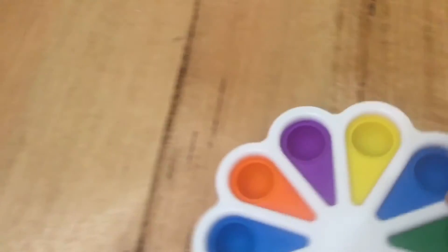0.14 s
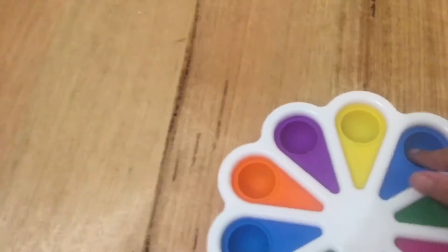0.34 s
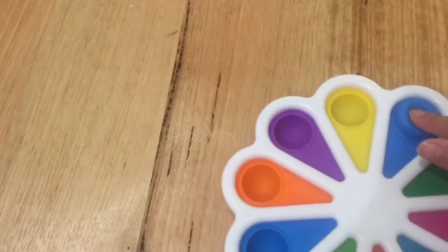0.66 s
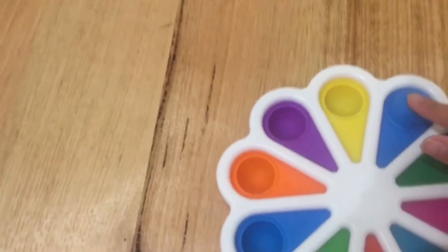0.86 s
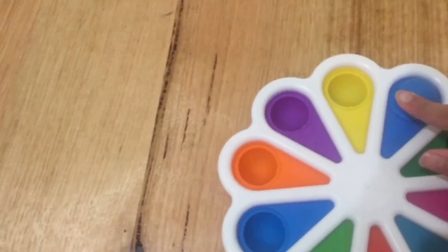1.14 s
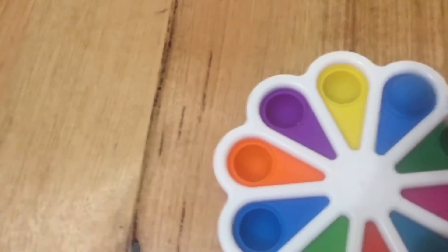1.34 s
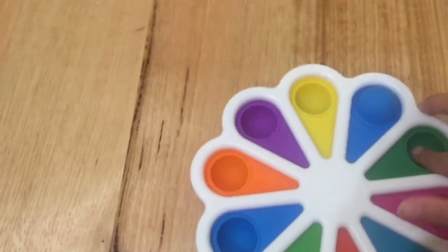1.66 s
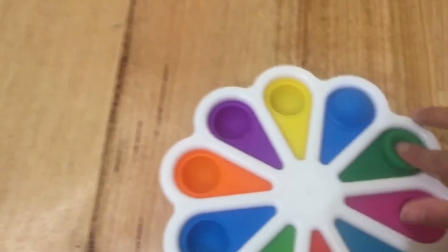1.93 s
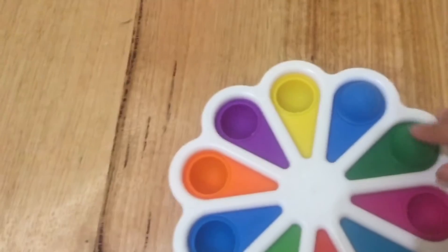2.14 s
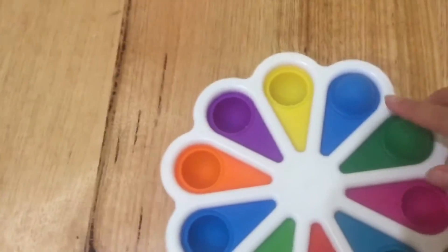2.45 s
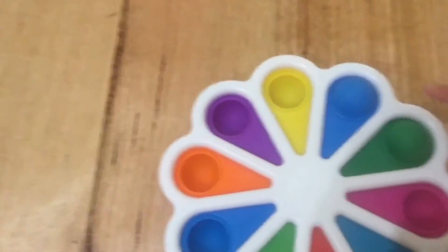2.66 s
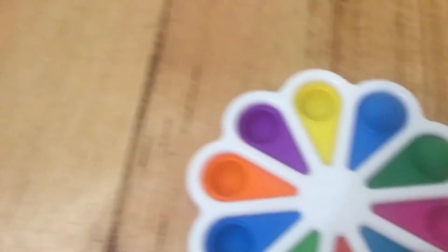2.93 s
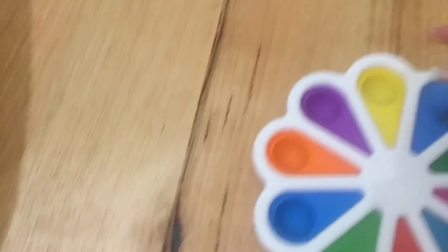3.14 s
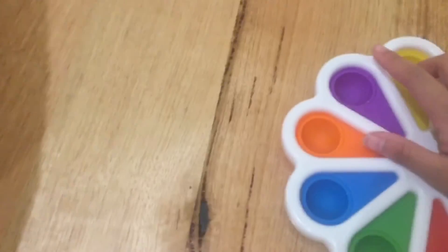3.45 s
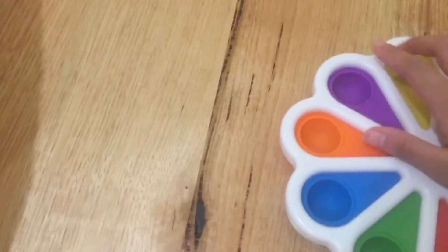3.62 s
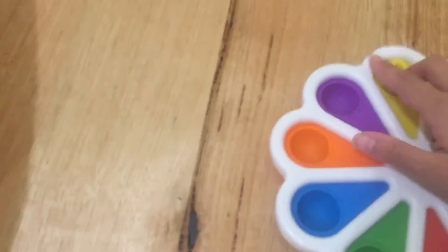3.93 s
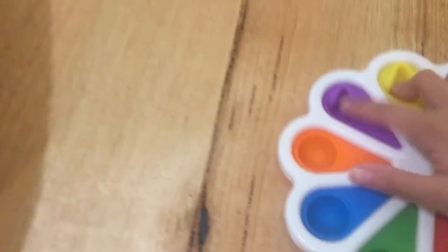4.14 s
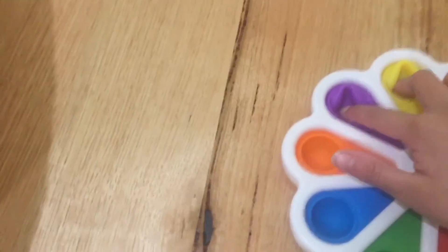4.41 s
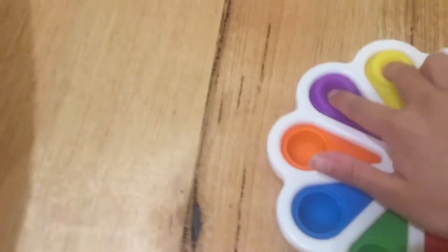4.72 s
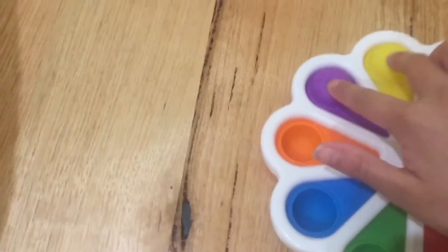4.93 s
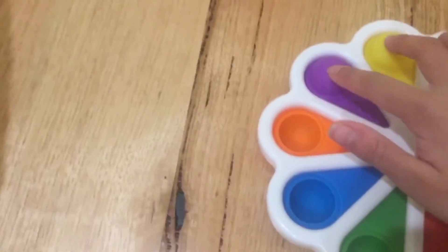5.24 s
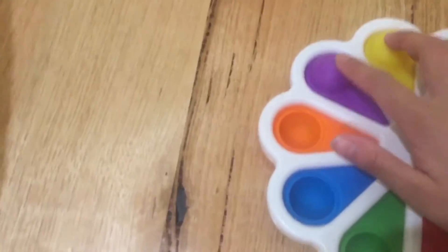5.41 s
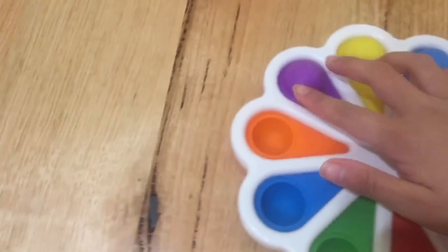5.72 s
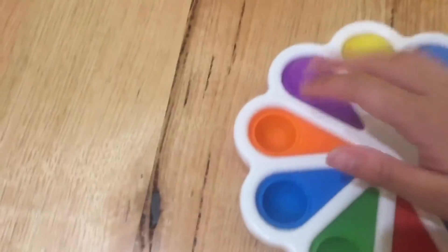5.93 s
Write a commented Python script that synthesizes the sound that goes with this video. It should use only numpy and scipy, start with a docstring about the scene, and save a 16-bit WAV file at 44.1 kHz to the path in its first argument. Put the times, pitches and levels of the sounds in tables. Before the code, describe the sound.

Time-reversed popping of a push-bubble toy, close to one microphone in a small room. Soft skin scuffs lead to one dominant hard pop with a low boom; faint squeaks and ticks follow, then a flurry of clacks. After a lull come crisp snaps, paired hollow pops and finally soft, muffled knocks. Every sound rises and ends suddenly over low rumble and hiss.

```python
"""In a small, quiet room the silicone bubbles of a push-pop toy are pressed on a wooden table.
Each pop is a struck set of decaying modes with a diffuse room tail, reversed in time: it swells and stops dead.
Booms are low modes amid narrow-band noise, also reversed; fingers rub and squeak as resonated random slips.
Beneath it all lies the steady, coloured noise of the room."""
import sys
import numpy as np
from scipy import signal
from scipy.fft import rfft, irfft, next_fast_len
from scipy.io import wavfile
from scipy.ndimage import uniform_filter1d

SR = 44100
rng = np.random.default_rng(int(sys.argv[2]) if len(sys.argv) > 2 else 0)


def inscribe(sig):
    """Save sig as 16-bit PCM at rate SR to the path in sys.argv[1].

    A 1-D sig is mono; a 2-D sig holds one channel per row.
    Samples are clipped to [-1, 1] before scaling.
    """
    pcm = np.round(np.clip(np.atleast_2d(sig).T, -1, 1) * 32767)
    wavfile.write(sys.argv[1], SR, pcm.astype(np.int16))


N = 267863  # length of the scene in samples


def undb(db):
    """Level definition: an amplitude gain is ten to the power of a twentieth of its decibels."""
    return 10 ** (np.asarray(db) / 20)


def unit(x):
    """Power normalization: scale a signal to a root mean square of one."""
    return x / np.sqrt(np.mean(x ** 2))


def decay(t, t60):
    """Exponential decay: the amplitude falls by 60 dB in every t60 seconds."""
    return np.exp(-np.log(1000) * t / t60)


def colour(x, points):
    """Linear filtering: weight the spectrum by (Hz, dB) points joined along a logarithmic frequency axis."""
    hz, db = np.transpose(points)
    f = np.maximum(np.fft.rfftfreq(len(x), 1 / SR), 1)
    gain = undb(np.interp(np.log(f), np.log(hz), db))
    return irfft(rfft(x) * gain, len(x))


def resonate(x, hz, width_hz):
    """Resonance: a second-order system passes its centre frequency with a gain of one."""
    b, a = signal.iirpeak(hz, hz / width_hz, fs=SR)
    return signal.lfilter(b, a, x)


def resonate_twice(x, hz, width_hz):
    """Cascaded resonance: two equal resonators in series give steeper skirts."""
    return resonate(resonate(x, hz, width_hz), hz, width_hz)


def add_reversed(out, sound, end_s):
    """Time reversal: superpose a sound backwards, so that its attack comes last, at end_s."""
    end = min(int(end_s * SR), N)
    count = min(end, len(sound))
    out[end - count:end] += sound[:count][::-1]


def air(level_db=-67):
    """Stationary noise: the faint, steady rumble and hiss of the room is random noise of a fixed spectrum."""
    # Spectrum of the background. Each row: frequency in Hz, relative level in dB per Hz.
    spectrum = [(15, -32), (25, -2.5), (43, -2), (80, 0), (113, -8), (148, -7), (241, -12.5), (269, -13.5),
                (392, -13.5), (449, -17), (527, -12.5), (587, -16), (857, -16.5), (1510, -19),
                (15800, -24.5)]
    return undb(level_db) * unit(colour(rng.standard_normal(N), spectrum))


def rubs(grain_db=5, patchy_db=2.0, patch_s=0.0084):
    """Friction: tiny random slips of skin on silicone excite resonators, broad for scuffs, narrow for squeaks."""
    # Scuffs of the fingers. Each row: middle in seconds, half length in seconds, level in dB, pitch in Hz.
    scuffs = [(0.026, 0.022, -67.5, 1800), (0.106, 0.09, -72, 885), (0.329, .14, -70, 1900),
              (0.404, 0.032, -62, 2400), (.865, .17, -70.5, 750), (2.656, .2, -78.5, 2800),
              (3.36, .11, -68.5, 900)]
    # Faint squeaks and one high, hissing scuff. Each row: middle in seconds, half length in seconds,
    # pitch in Hz, width of each resonator in Hz, level in dB.
    further_strokes = [(.395, 0.024, 7400, 1800, -61), (1.04, 0.1, 3660, 240, -69.5),
                       (1.043, 0.093, 2900, 240, -73), (1.173, .045, 2580, 500, -74),
                       (4.03, .033, 3720, 400, -75)]
    scuff_width = 1.7  # as a share of the scuff's pitch
    skin_hz, skin_width_hz, skin_db = 11605, 9000, -1  # dry hiss of the skin; dB over its scuff

    out, t = np.zeros(N), np.arange(N) / SR
    slips = rng.standard_normal(N) * undb(grain_db * rng.standard_normal(N))
    patches = unit(uniform_filter1d(rng.standard_normal(N), int(patch_s * SR)))
    grip = undb(patchy_db * patches)
    strokes = list(further_strokes)
    for s, half_s, db, hz in scuffs:
        strokes.append((s, half_s, hz, scuff_width * hz, db))
        strokes.append((s, half_s, skin_hz, skin_width_hz, db + skin_db))
    for s, half_s, hz, width_hz, db in strokes:
        on = np.abs(t - s) < 2 * half_s
        friction = unit(resonate_twice(slips[on], hz, width_hz) * grip[on])
        stroke = np.exp(-((t[on] - s) / half_s) ** 2)
        out[on] += undb(db) * friction * stroke
    return out


def booms(peak_s=0.039, rumble=.7):
    """Modal response: a low mode amid narrow-band rumble slowly builds and fades, reversed in time."""
    # Hollow booms of toy and table under a press. Each row: end in seconds, pitch in Hz, level in dB.
    presses = [(.553, 87.6, -44.5), (.64, 153.9, -64), (0.829, 157, -67.5), (1.232, 157, -67.5),
               (1.792, 85, -55.5), (1.871, 82, -51.5), (1.897, 48.4, -54), (2.105, 158.7, -50.5),
               (3.678, 107, -50.5), (3.674, 67, -54), (3.823, 93, -58), (3.979, 156, -69.5),
               (4.164, 148, -61), (4.204, 82, -58.5), (4.82, 159, -63.5), (4.867, 83, -57.5),
               (5.594, 146, -60), (5.785, 151.5, -61.5), (5.883, 99.4, -62)]
    # the lower the boom, the more it rumbles; the higher ones hum more cleanly
    rumble_hz, rumble_power = 90, 2.3

    out, t = np.zeros(N), np.arange(SR // 4) / SR
    swell = (t / peak_s * np.exp(1 - t / peak_s)) ** 2
    for s, hz, db in presses:
        spread = unit(resonate_twice(rng.standard_normal(len(t)), hz, hz / 2))
        share = rumble * (rumble_hz / hz) ** rumble_power
        mode = np.sin(2 * np.pi * hz * t)
        add_reversed(out, undb(db) * swell * unit(mode + share * spread), s)
    return out


def room_tail(build_s=0.012, echo_db=6, t60_s=0.22):
    """Reverberation: uneven reflections build up and decay exponentially, a few pitches standing out."""
    # Spectrum of the diffuse field. Each row: frequency in Hz, level in dB.
    spectrum = [(100, -8.5), (300, -9.5), (600, -9.5), (1000, -13), (2500, -14), (4000, -10), (7000, -13),
                (15000, -9.5)]
    # Resonances of the room. Each row: frequency in Hz, width in Hz, level in dB.
    resonances = [(1179, 58, -7.5), (2000, 23, -12.5)]

    t = np.arange(next_fast_len(SR // 4)) / SR
    noise = unit(rng.standard_normal(len(t)) * undb(echo_db * rng.standard_normal(len(t))))
    field = colour(noise, spectrum)
    for hz, width_hz, db in resonances:
        field = field + undb(db) * resonate(noise, hz, width_hz)
    fade = (1 - np.exp(-(t / build_s) ** 2)) * decay(t, t60_s)
    return field * fade / np.sqrt(np.sum(fade ** 2))


def snap(note_hz, t60, band_db, crack_db, note_db, detune, grain_db=4, attack_s=0.0038, contact_s=0.000074):
    """Modal superposition: a flipping dome rings its note and the frame's modes, and its rim crackles."""
    # Modes of the plastic frame. Each row: frequency in Hz, level in dB before the bands are balanced,
    # ring time as a share of t60.
    modes = [(84.43, -12, 1.2), (170, -4.5, 0.64), (320, -5.5, 1.2), (391, 1.5, 0.51), (562, -4.5, 0.9),
             (953, 1, 1.3), (1120, -2.5, 0.77), (1202, -2.5, 0.83), (1564.3, -6, 0.36), (1870, -6.5, 1.4),
             (2796, -8, 1.1), (3284, -7.5, 1.4), (3730, -2, 0.8), (4338, -5.5, 1.2), (5250, -2.5, 0.89)]
    # Successive limits of the thud, knock, clack, snap and fizz bands, in Hz.
    edges_hz = [55, 700, 1400, 3000, 7000, 19000]

    t = np.arange(SR // 20) / SR
    hz, mode_db, share = np.transpose(modes)[:, :, None]
    # each mode's pitch is scattered a little at random
    hz = hz * (1 + detune * rng.standard_normal(hz.shape))
    # neighbouring modes swing in opposite directions
    push = (-1) ** np.arange(len(modes))[:, None] * undb(mode_db)
    ring = np.sum(push * np.sin(2 * np.pi * hz * t) * decay(t, t60 * share), axis=0)
    note = undb(note_db) * np.cos(2 * np.pi * note_hz * t) * decay(t, 1.4 * t60)
    grains = rng.standard_normal(len(t)) * undb(grain_db * rng.standard_normal(len(t)))
    crack = undb(crack_db) * grains * decay(t, .85 * t60)
    onset = 1 - np.exp(-t / contact_s)
    blow = (ring + note + crack) * onset
    # a narrow dip near 640 Hz thins the blow
    blow = blow - resonate(blow, 639, 79)
    out = 0
    for low_hz, high_hz, db in zip(edges_hz, edges_hz[1:], band_db):
        sos = signal.butter(3, (low_hz, high_hz), "bandpass", fs=SR, output="sos")
        band = signal.sosfilt(sos, blow)
        # each band's level is that of its attack
        attack_rms = np.sqrt(np.mean(band[:int(attack_s * SR)] ** 2))
        out = out + undb(db) * band / attack_rms
    return out


def pops(count=2):
    """Impact excitation, reversed in time: a soft contact knocks dully, a hard one clacks, each with its tail."""
    # Pops and ticks. Each row: end of the reversed snap in seconds, strongest note in Hz, knock level in dB,
    # hardness of the contact in dB, thud level in dB, fizz level in dB, gain of the room tail in dB.
    presses = [ (0.1232, 940, -50.5, -9, -53.5, -63, -1), (0.289, 1184, -73, 5.5, -65.5, -60, 10),
               (.5360, 1209, -42, -8.5, -48, -45.5, -9), (0.5483, 1110, -17, -10.5, -25, -32, -7),
               (0.5502, 1970, -27, 3.5, -39.5, -27.5, -1.5), (.5631, 1992, -46, 3, -41, -36.5, -2),
               (0.9264, 3700, -78, 10.5, -88, -59, 7), (0.989, 1010, -63, -4.5, -68, -75, -1),
               (1.4164, 702, -57.5, -1.5, -52, -59.5, 1), (1.6272, 2660, -69.5, 3.5, -68, -59.5, 8),
               (1.6624, 4880, -64, 4, -63, -57.5, 4), (1.7142, 1410, -57, -4, -66.5, -69, 7.5),
               (1.7877, 1325, -49.5, -3.5, -59, -70, 4.5), (1.8379, 1270, -45.5, -5, -56, -70, -10),
               (1.85, 1470, -43.5, -1, -60, -69, 0.5), (1.8808, 925, -47, 0, -62, -47, -6),
               (1.8903, 2920, -58.5, 8.5, -52, -41.5, -13), (1.8934, 3580, -66, 10, -72, -39.5, -13),
               (1.9107, 3670, -43.5, -1.5, -47.5, -44.5, 10), (2.1208, 2325, -37, 1, -45, -48.5, -3),
               (2.2372, 3330, -62, 0.5, -76.5, -75, 4), (2.2510, 1450, -64, -1.5, -77, -78, -6),
               (2.522, 1460, -67, -5, -78.5, -81.5, 1.5), (2.554, 1420, -65, -0.5, -75, -65, 5),
               (2.6, 1220, -67.5, 0, -75, -62.5, -4.5), (2.9060, 1090, -66, -10, -70, -80, 0),
               (3.375, 1033, -56, -2.5, -63, -63, -2), (3.4156, 1385, -64, 7, -83, -54.5, 7),
               (3.6684, 2670, -35.5, 0, -38, -40, -.5), (3.6740, 2600, -48, -4, -45.5, -61, 9.5),
               (3.8107, 746, -52, -1.5, -54.5, -62, 2), (3.8215, 922, -35.5, -13, -47.5, -32, -3.5),
               (3.9773, 904, -55, -20.5, -64, -77.5, 2.5), (4.1631, 910, -45.5, -10.5, -51.5, -68.5, 0.5),
               (4.1697, 1105, -43.5, -8, -53, -75.5, 0), (4.201, 1035, -47, -5.5, -49.5, -51.5, 1),
               (4.2794, 3650, -69, 2, -78, -68, 11), (4.3150, 3460, -70.5, 3.5, -76, -76, 9),
               (4.8217, 1280, -50, -3, -52, -51, -4.5), (4.8359, 1020, -37, -7.5, -40, -45.5, -1),
               (4.8652, 2300, -61, 0, -54, -54, 4), (5.587, 1040, -55, -27, -57, -78.5, 0),
               (5.5944, 1092, -49.5, -26, -53.5, -79, -6), (5.7660, 950, -57, -26, -59.5, -78.5, -4.5),
               (5.7840, 933, -49.5, -30, -53.5, -77.5, -2), (5.8528, 903, -52.5, -27, -52.5, -83, -1),
               (5.867, 925, -63, -16, -51, -83.5, 7), (5.8815, 974, -38.5, -18, -42, -68, -3),
               (5.9232, 2800, -64, -3, -74, -73, 5), (6.0586, 1020, -45.5, -29, -48.5, -72, -3)]
    # Clack and snap of the frame. Each row: centre in Hz, level in dB over the knock,
    # dB gained per dB of hardness.
    contact = [(2000, .5, 1.07), (4370, -2, 1.39)]
    # ring time for a middling press and note; a firmer finger damps it, and higher notes die sooner
    ring_t60_s, mid_press_db, mid_note_hz = .024, -49.5, 990
    ring_halving_db, ring_note_power = 65, .3
    # clack and snap ring louder the nearer they lie to the dome's note
    note_lift_db, note_reach_octaves = 4, 0.57

    out = np.zeros(N)
    centre_hz, offset_db, per_hardness = np.transpose(contact)
    for s, note_hz, db, hardness_db, thud_db, fizz_db, room_db in presses:
        octaves = np.log2(centre_hz / note_hz)
        lift_db = note_lift_db * np.exp(-(octaves / note_reach_octaves) ** 2)
        clack_db, snap_db = db + offset_db + per_hardness * hardness_db + lift_db
        band_db = thud_db, db, clack_db, snap_db, fizz_db
        press_damping = 2 ** ((mid_press_db - db) / ring_halving_db)
        t60 = ring_t60_s * press_damping * (mid_note_hz / note_hz) ** ring_note_power
        add_reversed(out, snap(note_hz, t60, band_db, crack_db=5.0, note_db=2.5, detune=.012), s)
        # the toy radiates a different mix towards each wall
        for _ in range(count):
            sideways = snap(note_hz, t60, band_db, crack_db=6.5, note_db=-5, detune=.06)
            reflected = signal.fftconvolve(sideways, room_tail())
            add_reversed(out, undb(room_db) / np.sqrt(count) * reflected, s)
    return out


def scene():
    """Linear superposition: room noise, finger friction, booms and pops add up at one point."""
    return (air() + rubs() + booms() + pops())[None]


def record(dry, top_hz=15950):
    """Transducer response: one microphone, a little bright at the very top, with a steep cut above."""
    bright = colour(dry[0], [(5000, -0.67), (7500, -1.4), (10000, 0), (15500, 1.5)])
    lowpass = signal.firwin(255, top_hz, window="blackman", fs=SR)
    return signal.fftconvolve(bright, lowpass, "same")[None]


dry = scene()
out = record(dry)
inscribe(out)
```